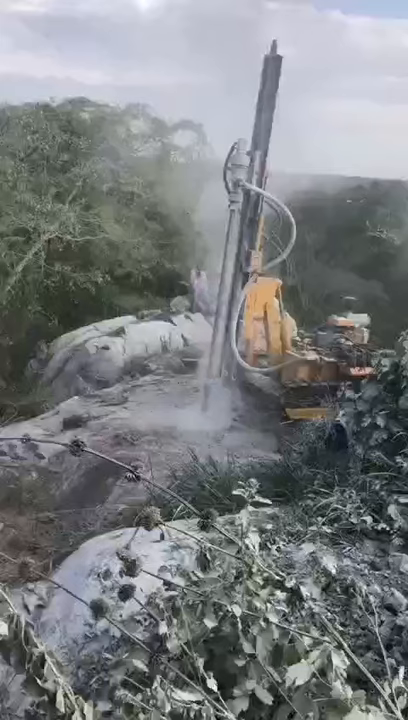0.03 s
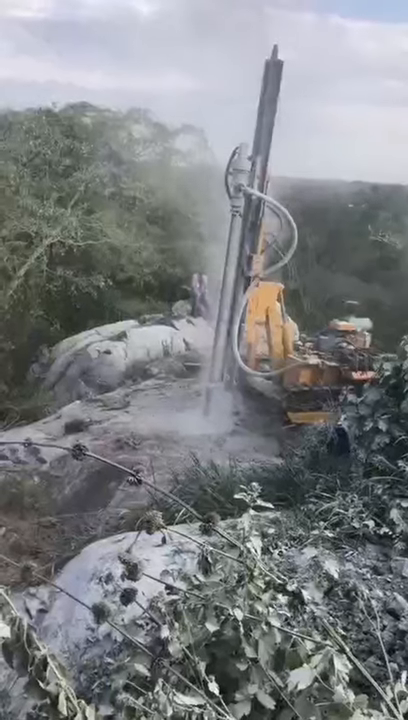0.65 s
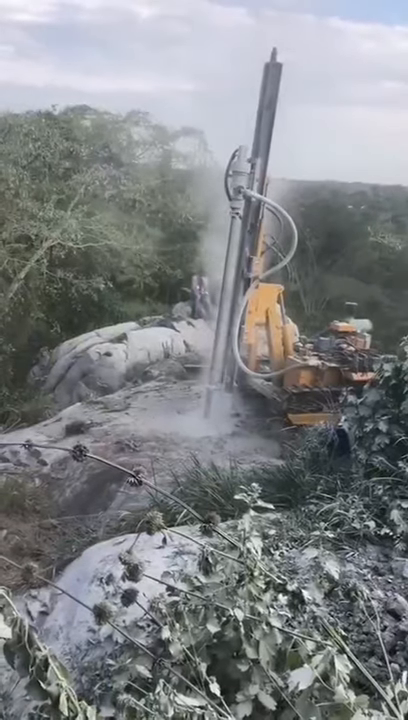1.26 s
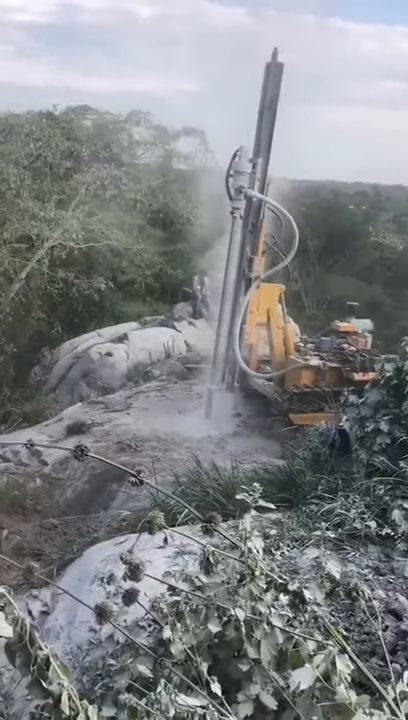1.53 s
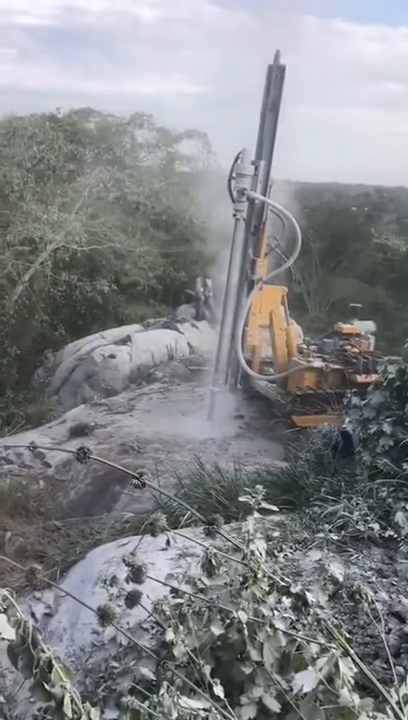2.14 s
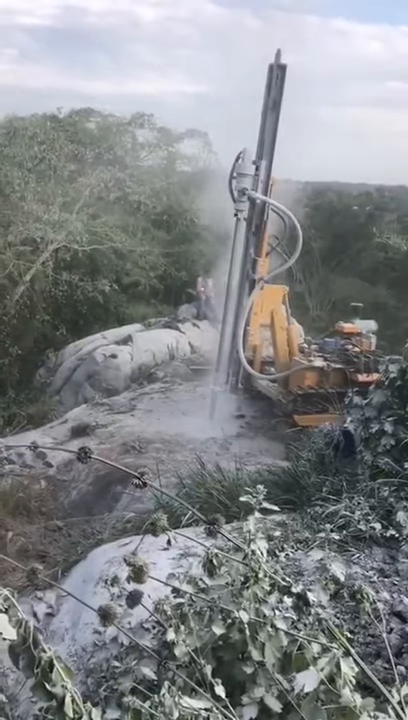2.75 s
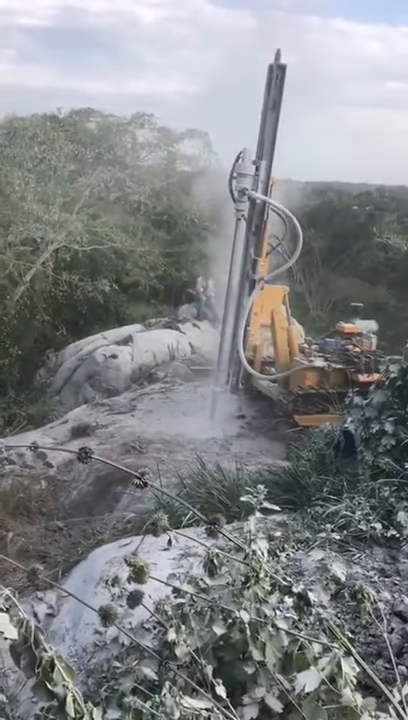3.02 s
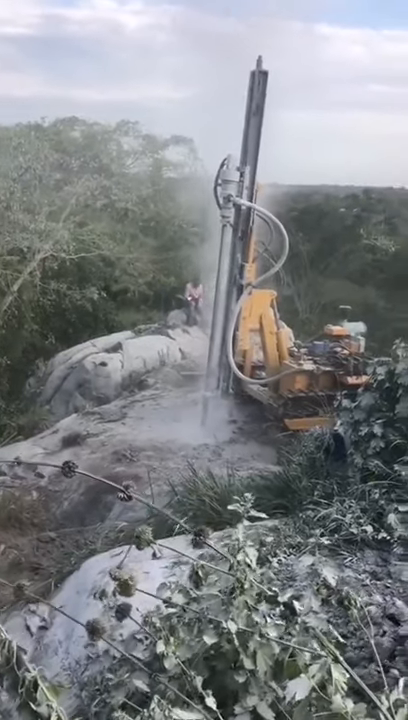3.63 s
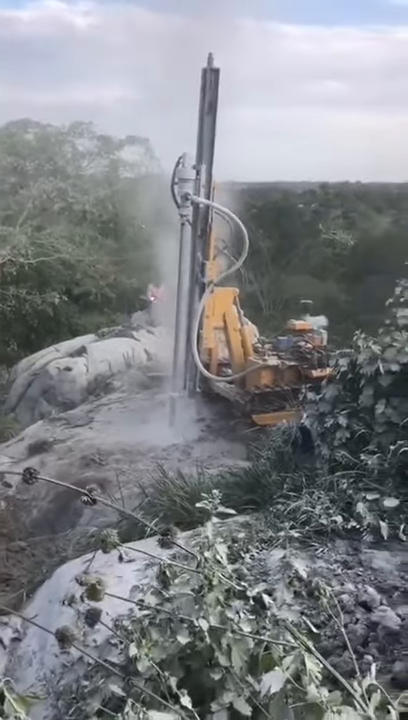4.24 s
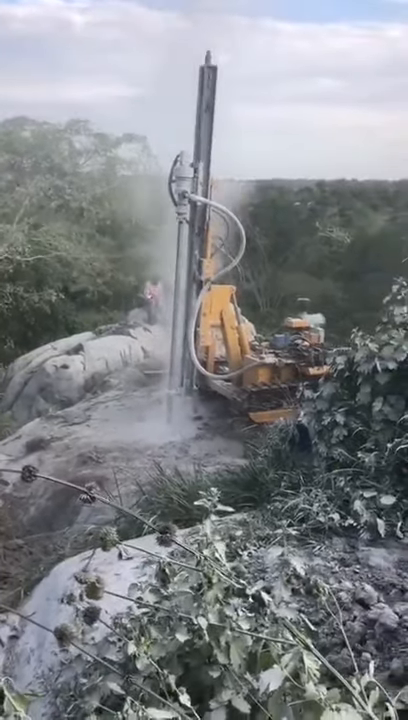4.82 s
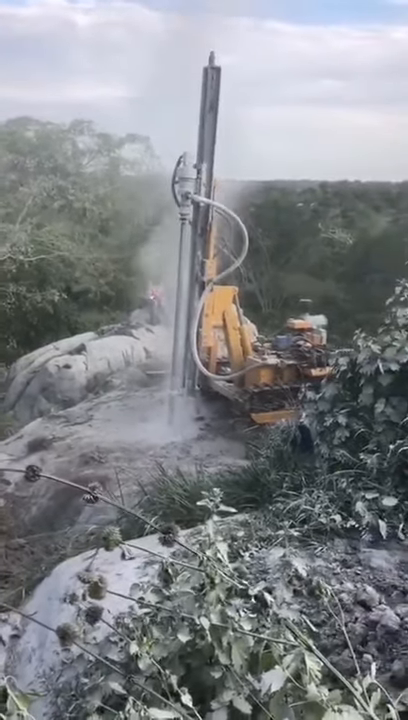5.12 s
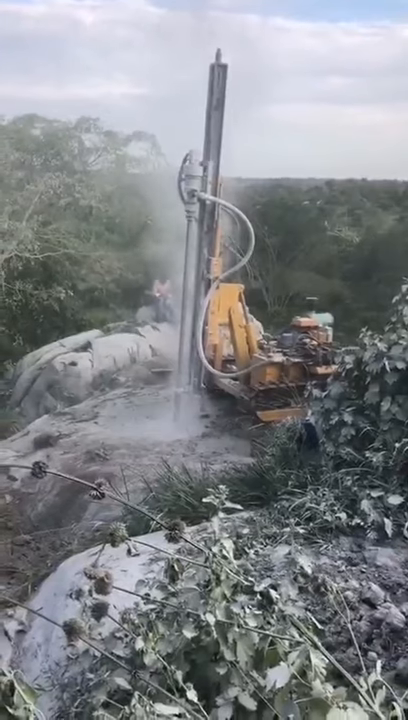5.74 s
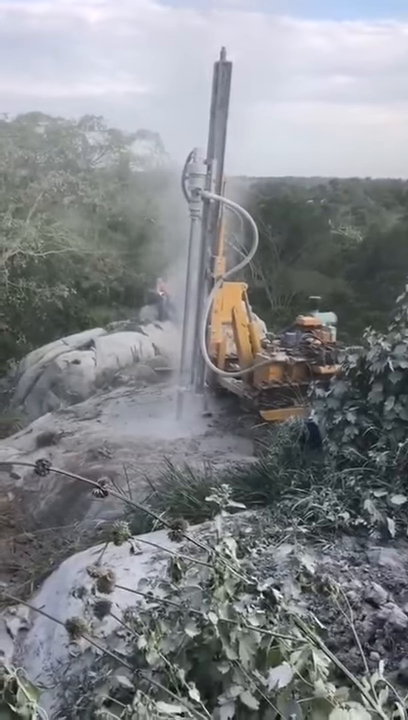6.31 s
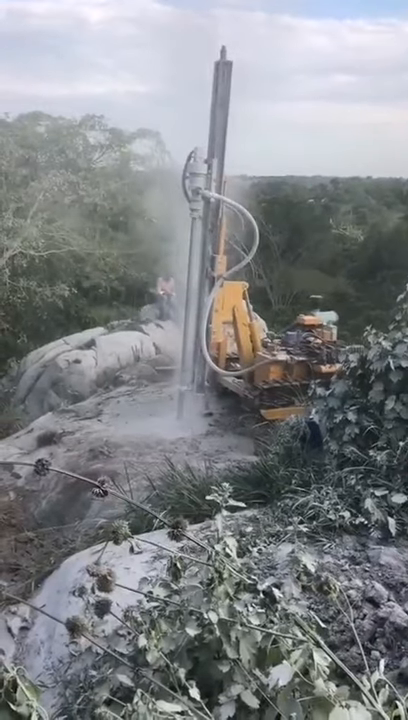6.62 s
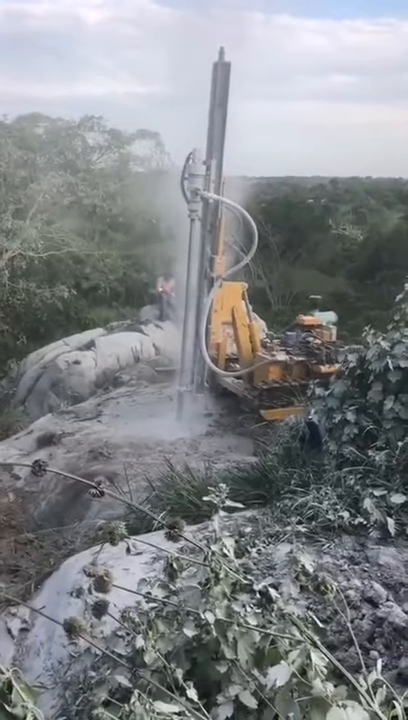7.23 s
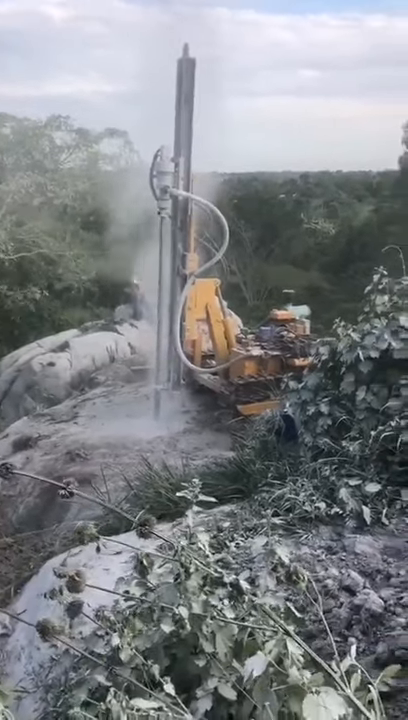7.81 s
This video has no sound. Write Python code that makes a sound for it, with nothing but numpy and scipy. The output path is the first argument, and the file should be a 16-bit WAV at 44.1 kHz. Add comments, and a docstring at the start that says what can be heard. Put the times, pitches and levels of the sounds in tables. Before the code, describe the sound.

Fast, continuous pounding of a rock drill outdoors, mixed with compressed air hiss, steel clanks and a steady engine drone.

```python
"""Open ground, some way from a crawler rig drilling rock with an air hammer.
About 22 times a second the piston strikes the bit; spent air then chuffs out of the hole and
hisses away with the dust. The turning drill tube rattles, clangs and rings under the blows.
A diesel engine drones steadily underneath."""
import sys
import numpy as np
from scipy import signal
from scipy.fft import rfft, irfft
from scipy.io import wavfile

SR = 44100
rng = np.random.default_rng(int(sys.argv[2]) if len(sys.argv) > 2 else 0)


def wav_out(sig):
    """Save sig, one row per channel (or a flat mono array), as 16-bit PCM at SR to the path in sys.argv[1]."""
    wavfile.write(sys.argv[1], SR, np.round(np.clip(np.atleast_2d(sig).T, -1, 1) * 32767).astype(np.int16))


N = 351036
TIME = np.arange(N) / SR


# hammer rate, quickening and slowing slightly about once per turn of the tube: time_s, rate_hz
HAMMER_RATE = [(0.2, 21.668), (0.34, 22.76), (0.76, 21.696), (0.9, 22.609), (1.32, 21.966), (1.46, 22.294),
               (1.74, 21.692), (2.02, 22.552), (2.3, 21.952), (2.44, 22.746), (2.86, 21.946),
               (3.28, 22.717), (3.42, 22.14), (3.56, 22.448), (3.98, 22.542), (4.12, 21.878), (4.4, 22.386),
               (4.68, 22.496), (5.1, 21.608), (5.24, 21.762), (5.38, 21.62), (5.52, 22.067), (5.66, 21.846),
               (5.8, 22.555), (5.94, 22.171), (6.22, 22.185), (6.36, 21.726), (6.5, 22.395), (7.06, 22.084),
               (7.34, 22.601), (7.48, 21.942), (7.76, 22.227)]

def hammer_cycle(sync_s, jitter_s):
    """Piston blow times and running cycle count; each stroke lands slightly early or late."""
    count = count_cycles(HAMMER_RATE, sync_s)
    blows_s = np.interp(np.arange(np.ceil(count[0]), np.ceil(count[-1]) + 1), count, TIME)
    blows_s[:-1] += jitter_s * rng.standard_normal(len(blows_s) - 1)
    return blows_s, np.interp(TIME, blows_s, np.arange(len(blows_s)))


# bit on rock, heard through the hole: pitch_hz, level_db, t60_s
BIT_MODES = [(305, -14.5, 0.026), (444, -22, 0.029), (660, -11, 0.025), (765, -17.5, 0.032),
             (1187, -17, 0.017), (2760, -18.5, 0.012), (3780, -32, 0.02)]
# cracking rock spectrum: freq_hz, density_db
CRACK_SPECTRUM = [(100, -64), (350, -49), (560, -69), (750, -49), (1400, -53), (1850, -46), (2200, -47.5),
                  (3600, -45.5), (4500, -49.5), (7000, -49.5), (11500, -61.5)]

def bit_strikes(blows_s, cycle, ring_db, shock_db, crack_db, crack_s, spread_db):
    """Each blow sends out a shock, rings bit and hole, and cracks off a short spray of rock."""
    force = gain_of(spread_db * rng.standard_normal(len(blows_s)))
    stroke = cycle.astype(int)
    spray = force[stroke] * np.exp(-abs(TIME - blows_s[stroke]) / crack_s)
    crack = spray * noise(CRACK_SPECTRUM)
    hits = pulses(blows_s + .0001, force)
    front = shock(hits, top_hz=7500, low_hz=1100, sweep_s=.0003, fade_s=.0008)
    thud = knock(hits, BIT_MODES, rise_s=.0001)
    return gain_of(shock_db) * front + gain_of(ring_db) * thud + gain_of(crack_db) * crack


def shock(hits, top_hz, low_hz, sweep_s, fade_s):
    """A blow's hard front travels up the steel, treble first."""
    t = TIME[:SR // 100]
    hz = low_hz + (top_hz - low_hz) * np.exp(-t / sweep_s)
    chirp = np.exp(-t / fade_s) * np.sin(2 * np.pi * np.cumsum(hz) / SR)
    return signal.oaconvolve(hits, chirp)[:N]


# air burst, heard through the hole: pitch_hz, level_db, t60_s
EXHAUST_MODES = [(175.4, -22.5, 0.074), (325.4, -2, 0.019), (668, -5.5, 0.024), (990, -15.5, 0.021),
                 (1243, -15, 0.021), (1750, -22, 0.011)]
# air puff spectrum: freq_hz, density_db
PUFF_SPECTRUM = [(60, -43), (200, -60), (330, -59), (500, -53), (670, -61.5), (860, -57), (1250, -47),
                 (1500, -82), (1780, -49.5), (2500, -55.5), (5000, -59), (11500, -54)]

def air_exhaust(blows_s, delay_s, pop_db, puff_db, puff_s):
    """The port opens between blows: spent air pops out of the hole with a rough puff."""
    late, size = rng.standard_normal((len(blows_s), 2)).T
    openings = pulses(blows_s + delay_s + .0004 * late, gain_of(.4 * size))
    pop = knock(openings, EXHAUST_MODES, rise_s=.0032)
    t = TIME[:SR // 20]
    puff = signal.oaconvolve(openings, t / puff_s * np.exp(1 - t / puff_s))[:N]
    return gain_of(pop_db) * pop + gain_of(puff_db) * puff * noise(PUFF_SPECTRUM)


# air flow after a blow: cycle_fraction, flow_ratio
PORT_FLOW = [(0, 0.5), (.12, 0.42), (.28, 0.36), (.36, 0.66), (.44, 0.68), (.7, 0.78), (1, 0.65)]

def port_flow(cycle):
    """Air flow, choked while the piston covers the port."""
    return np.interp(cycle % 1, *np.transpose(PORT_FLOW))


# air and grit hiss spectrum: freq_hz, density_db
JET_SPECTRUM = [(100, -60.5), (270, -55), (420, -74), (680, -55.5), (840, -61), (1000, -58.5), (1550, -58),
                (2300, -55), (3000, -57.5), (5000, -57), (6000, -53.5), (8000, -52.5), (11500, -53)]

def air_jet(flow, gust_db, grit_db):
    """Air and grit hiss unevenly from the hole."""
    flutter_db = gust_db * wander(47) + grit_db * wander(690)
    return flow * gain_of(flutter_db) * noise(JET_SPECTRUM)


# air column harmonics: hammer_multiple, level_db
THROB_HARMONICS = [(2, -31), (3, -29.5), (4, -34), (5, -27), (6, -35.5), (7, -42.5), (8, -42), (10, -56)]

def air_throb(cycle, crest_fraction, wobble):
    """Each air surge pushes as it rises and pulls as it falls: a low, uneven throb."""
    phase = 2 * np.pi * (crest_fraction - cycle)
    return sum(gain_of(db) * (1 + wobble * wander(5)) * np.sin(k * phase) for k, db in THROB_HARMONICS)


# lower tube modes: pitch_hz, level_db, t60_s
TUBE_MODES = [(994, -27.5, 0.07), (1305, -35, 0.057), (1442, -21.5, 0.076), (1724, -17.5, 0.084),
              (1811, -25, 0.054), (1997, -26, 0.069), (2305, -28, 0.044)]
# tube hits its guide: start_s, level_db
GUIDE_HITS = [(.263, -19), (0.698, -16.5), (.788, -14.5), (.924, -18), (1.422, -17), (1.968, -18),
              (2.554, -24), (2.585, -19), (2.779, -16), (3.233, -21), (3.306, -23), (4.26, -19),
              (5.066, -20), (5.204, -22), (5.337, -18), (5.607, -19), (5.929, -19), (5.979, -20),
              (6.778, -19), (7.239, -17), (7.634, -23)]
# tube free of its guide, ring fades: centre_s, length_s, force_db
TUBE_LULLS = [(1.64, 0.2, -7), (1.87, 0.08, -7), (3.1, 0.12, -8), (7.37, 0.15, -7), (7.86, 0.15, -7)]

def tube_clangs(blows_s, ring_db, rebound_s, rebound_db, clang_db):
    """The tube rings at each blow and looser rebound, and clangs when it swings against its guide."""
    rebounds_s = blows_s + rebound_s + .002 * rng.standard_normal(len(blows_s))
    contact = gain_of(swells(TUBE_LULLS))
    ring = np.zeros(N)
    for mode in TUBE_MODES:
        blow_force, rebound_force = gain_of(rng.uniform(-6.5, 3.4, (len(blows_s), 2))).T
        hits = pulses(blows_s, blow_force) + gain_of(rebound_db) * pulses(rebounds_s, rebound_force)
        ring += knock(hits * contact, [mode], rise_s=.0008)
    start_s, level_db = np.transpose(GUIDE_HITS)
    clangs = knock(pulses(start_s, gain_of(level_db + clang_db)), TUBE_MODES, rise_s=.0017)
    return gain_of(ring_db) * ring + clangs


# hardest bites: start_s, level_db
HARD_BITES = [(.834, -19), (.879, -19), (.924, -18), (2.096, -23), (2.633, -25), (2.677, -19), (3.262, -20),
              (3.306, -15), (3.35, -16), (3.396, -16), (3.44, -17), (3.485, -17.5), (4.515, -18),
              (4.604, -19), (5.101, -17), (5.143, -20), (5.56, -17.5), (5.743, -16), (6.734, -17),
              (6.959, -16.5), (7.004, -21)]
# bright clank modes: pitch_hz, level_db, t60_s
CLANK_MODES = [(3300, -30, 0.023), (3440, 3, 0.062), (3600, -11, .03), (3660, 2, 0.049)]

def bite_clanks(blows_s, turn_s, bite_at_s, base_db, swing_db, hard_db):
    """Blows clank as the bit bites, harder once per tube turn; a few stand well out."""
    bite_db = swing_db * np.cos(2 * np.pi * (blows_s - bite_at_s) / turn_s)
    bite_db += 2 * rng.standard_normal(len(blows_s))
    start_s, level_db = np.transpose(HARD_BITES)
    hits = pulses(blows_s, gain_of(base_db + bite_db)) + pulses(start_s, gain_of(level_db + hard_db))
    return knock(hits, CLANK_MODES, rise_s=.0002)


# chip-struck tube modes: pitch_hz, rms_db, t60_s
PING_MODES = [(3720, -34.5, 0.12), (5340, -35, 0.094), (5377, -36.5, 0.083)]

def chip_pings(per_mode_hz):
    """Larger chips hit the tube at random, each ringing one high mode."""
    pings = np.zeros(N)
    for hz, db, t60_s in PING_MODES:
        chips = (rng.random(N) < per_mode_hz / SR) * rng.uniform(.3, 1, N)
        ring = knock(chips, [(hz, 0, t60_s)], rise_s=.0005)
        pings += gain_of(db) * ring / ring.std()
    return pings


# thin tube whistles: centre_s, length_s, pitch_hz, peak_db
TUBE_WHISTLES = [(.65, .09, 5647, -34), (.9, .07, 5729, -33.5), (1.36, .07, 5647, -33.5),
                 (1.88, .14, 5729, -33.5), (2.5, .11, 5647, -32), (3.39, .09, 5647, -33),
                 (3.75, .1, 5647, -30.5), (4.7, .08, 5647, -33.5), (4.88, .07, 5729, -34),
                 (5.3, .13, 5647, -34), (6.23, .2, 5647, -33), (6.82, .11, 5729, -32)]
# long-ringing tube modes: pitch_hz, rms_db, width_hz
TUBE_RING = [(5647, -35.5, 3), (5729, -36.5, 3), (5830, -39, 4), (6287, -43, 6), (6486, -41, 6),
             (6712, -44, 6), (6960, -43.5, 6), (7671, -44, 8), (8295, -44, 8), (8661, -40.5, 8),
             (9043, -41, 8), (9442, -42.5, 8), (10298, -43, 8)]
# chip rattle spectrum: freq_hz, density_db
RATTLE_SPECTRUM = [(500, -68.5), (1000, -61), (1550, -60), (1800, -54), (2300, -58), (3050, -61.5),
                   (3400, -58.5), (4200, -61), (5100, -72.5), (5500, -60.5), (7000, -64.5), (11500, -66)]

def tube_rattle(flow, rattle_db, clatter_db):
    """Chips carried up by the air rattle on the turning tube, which sings thinly."""
    contact = gain_of(clatter_db * np.tanh(wander(70))) * flow
    ring = sum(swells([(centre_s, length_s, gain_of(db))]) * np.sin(2 * np.pi * hz * TIME)
               for centre_s, length_s, hz, db in TUBE_WHISTLES)
    for hz, db, width_hz in TUBE_RING:
        pole = np.exp((2j * hz - width_hz) * np.pi / SR)
        mode = signal.lfilter([1], [1, -pole], contact * rng.standard_normal(N)).imag
        ring += gain_of(db) * mode / mode.std()
    return contact * gain_of(rattle_db) * noise(RATTLE_SPECTRUM) + ring


# governed working-cycle rate: time_s, rate_hz
ENGINE_RATE = [(1.3, 13.801), (2.5, 13.789), (3.6, 13.8), (4.7, 13.785), (5.5, 13.813), (6.5, 13.805),
               (7.5, 13.793)]
# engine orders: cycle_multiple, level_db
ENGINE_ORDERS = [(3, -39), (4, -36), (5, -31.5), (6, -39), (7, -32), (8, -29), (9, -42), (11, -37),
                 (12, -43), (15, -44), (19, -34), (23, -39), (24, -39.5), (26, -37.5), (29, -44), (32, -47),
                 (44, -41)]
# dull rumble spectrum: freq_hz, density_db
RUMBLE_SPECTRUM = [(15, -78), (30, -70), (42, -60), (70, -53.5), (120, -52.5), (170, -57.5), (240, -60),
                   (300, -68), (400, -60.5), (650, -58.5), (850, -69.5), (3000, -77.5)]

def diesel(firing_s, drone_db, rumble_db):
    """A governed four-cylinder diesel drones over a dull rumble."""
    cycle = count_cycles(ENGINE_RATE, firing_s)
    # low orders crest as the strongest cylinder fires; the exhaust pipe scatters higher phases
    drone = sum(gain_of(db) * np.cos(2 * np.pi * (k * cycle + rng.random() * (k > 8)))
                for k, db in ENGINE_ORDERS)
    return gain_of(drone_db) * drone + gain_of(rumble_db) * noise(RUMBLE_SPECTRUM)


def close_echoes(sound, level_db, count):
    """Faint reflections off mast, tracks and bare rock ripple the treble."""
    taps = np.zeros(SR // 60)
    taps[rng.integers(SR // 1000, len(taps), count)] = rng.choice([-1, 1], count) / np.sqrt(count)
    treble = signal.sosfilt(signal.butter(2, 1200, "high", fs=SR, output="sos"), sound)
    return gain_of(level_db) * signal.oaconvolve(treble, taps)[:N]


def gain_of(db):
    """Decibels to amplitude factor."""
    return 10 ** (np.asarray(db) / 20)


def count_cycles(rates, zero_s):
    """Running cycle count of a rate curve, zero at zero_s."""
    count = np.cumsum(np.interp(TIME, *np.transpose(rates))) / SR
    return count - np.interp(zero_s, TIME, count)


def noise(spectrum):
    """Noise of given density per Hz, interpolated over log frequency."""
    hz, db = np.transpose(spectrum)
    density_db = np.interp(np.log(np.fft.rfftfreq(N, 1 / SR) + 1), np.log(hz), db)
    return irfft(rfft(rng.standard_normal(N)) * gain_of(density_db), N) * np.sqrt(SR / 2)


def wander(rate_hz):
    """Smooth random drift, rms 1."""
    low_pass = np.exp(-(np.fft.rfftfreq(N, 1 / SR) / rate_hz) ** 2)
    drift = irfft(rfft(rng.standard_normal(N)) * low_pass, N)
    return (drift - drift.mean()) / drift.std()


def pulses(times_s, sizes):
    """Train of one-sample clicks."""
    train = np.zeros(N)
    inside = (times_s >= 0) & (times_s < TIME[-1])
    train[(times_s[inside] * SR).astype(int)] = sizes[inside]
    return train


def knock(train, modes, rise_s):
    """Clicks ring damped modes; each push builds over rise_s."""
    t = TIME[:SR // 20]
    ring = sum((-1) ** k * gain_of(db - 60 * t / t60_s) * np.sin(2 * np.pi * hz * t)
               for k, (hz, db, t60_s) in enumerate(modes))
    attack = 1 - np.exp(-(t / rise_s) ** 2)
    return signal.oaconvolve(train, ring * attack)[:N]


def swells(events):
    """One bell curve per event, length_s wide at half height."""
    return sum(height * .5 ** ((2 * (TIME - centre_s) / length_s) ** 2)
               for centre_s, length_s, height in events)


# rig workload: time_s, jet_db, rattle_db
WORKLOAD = [(0.25, 1, -0.5), (0.72, 0.5, 2.5), (0.89, 2, 0), (1.12, 1.5, -0.5), (2.08, 0.2, 0),
            (2.54, 2, -1), (3.34, -0.5, 1), (3.52, 1, 3.5), (3.77, 2, -2), (4.55, 0.6, -1.5),
            (4.79, 1.0, 1.5), (5.2, 1, -0.5), (5.33, 1.5, 5), (5.61, -1, 2.5), (6.32, 1.9, -3),
            (6.5, -1, -1), (7.58, -0.5, -0.5), (7.8, 0.5, -0.5)]

def scene():
    """One piston cycle drives blows, air and rattle; tube rotation and engine run on their own."""
    time_s, *levels_db = np.transpose(WORKLOAD)
    jet_db, rattle_db = (np.interp(TIME, time_s, db) for db in levels_db)
    blows_s, cycle = hammer_cycle(sync_s=.2033, jitter_s=.0002)
    flow = port_flow(cycle)
    hole = bit_strikes(blows_s, cycle, ring_db=-1, shock_db=-7, crack_db=-3.5,
                       crack_s=.0072, spread_db=.47)
    hole += air_exhaust(blows_s, delay_s=.017, pop_db=0, puff_db=1.1, puff_s=.0025)
    hole += gain_of(jet_db) * air_jet(flow, gust_db=1.5, grit_db=2)
    mix = hole + close_echoes(hole, level_db=-18, count=16)
    mix += air_throb(cycle, crest_fraction=.755, wobble=.1)
    mix += tube_clangs(blows_s, ring_db=-.5, rebound_s=.0145, rebound_db=-2, clang_db=22)
    mix += bite_clanks(blows_s, turn_s=.604, bite_at_s=.3, base_db=-28.5, swing_db=8, hard_db=.5)
    mix += chip_pings(per_mode_hz=50)
    mix += tube_rattle(flow, rattle_db + 2, clatter_db=6)
    mix += diesel(firing_s=.0637, drone_db=-1, rumble_db=1.5)
    return mix[None]


def record(dry):
    """Rounded peaks, limited band, abrupt start."""
    ceiling, start_s, low_hz, high_hz = .76, .173, 29, 11650
    rounded = dry / (1 + (dry / ceiling) ** 6) ** (1 / 6)
    high_passed = signal.sosfiltfilt(signal.butter(4, low_hz, "high", fs=SR, output="sos"), rounded)
    low_pass = signal.firwin(301, high_hz, window=("kaiser", 8), fs=SR)
    return signal.oaconvolve(high_passed * (TIME >= start_s), low_pass[None], "same")


dry = scene()
out = record(dry)
wav_out(out)
```